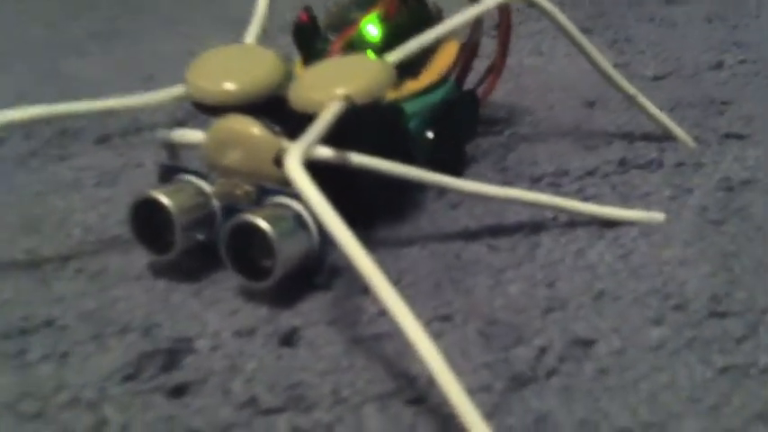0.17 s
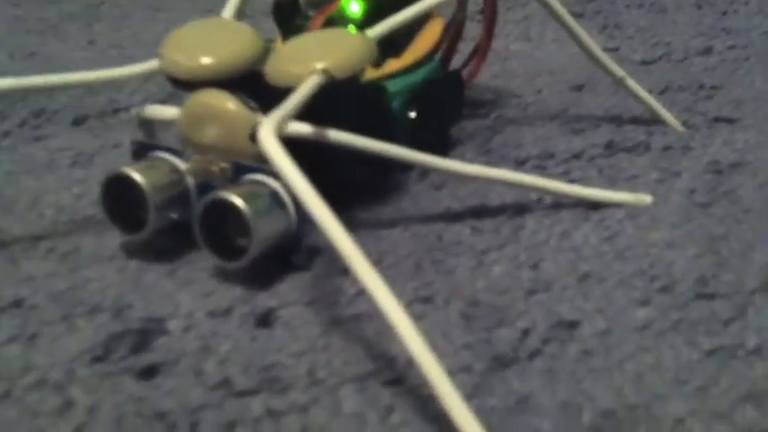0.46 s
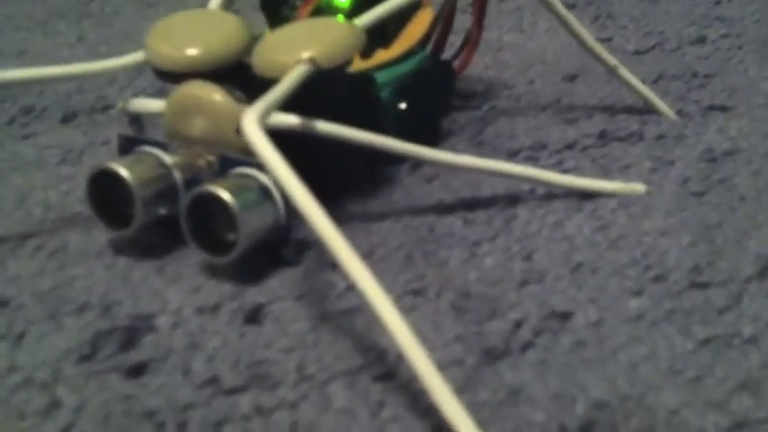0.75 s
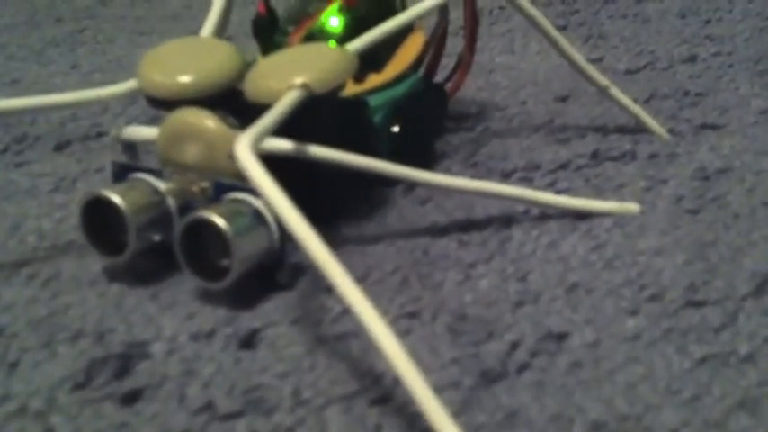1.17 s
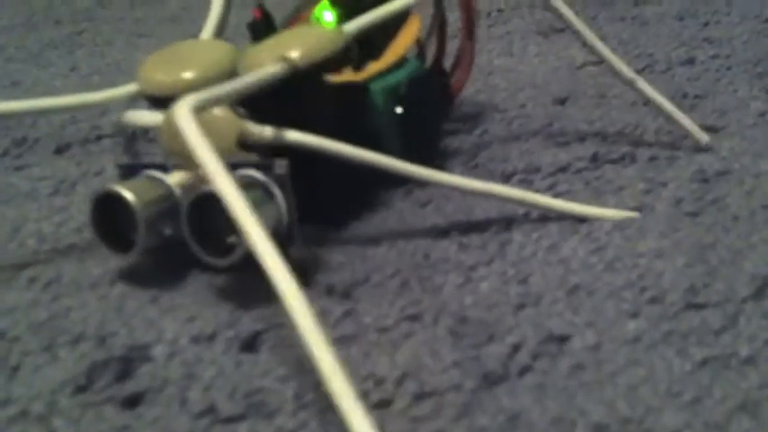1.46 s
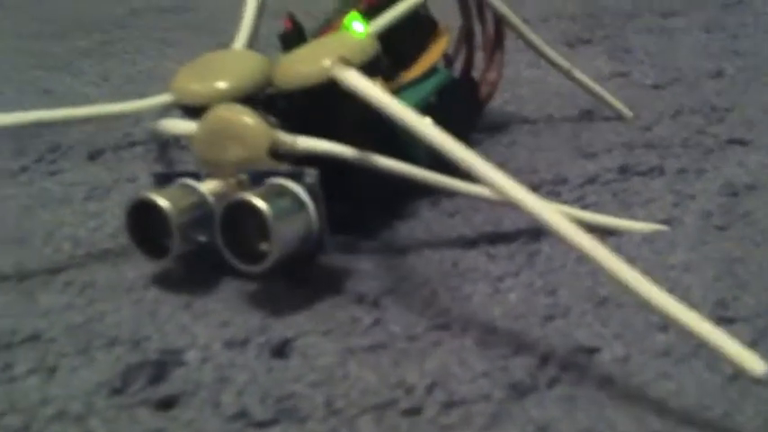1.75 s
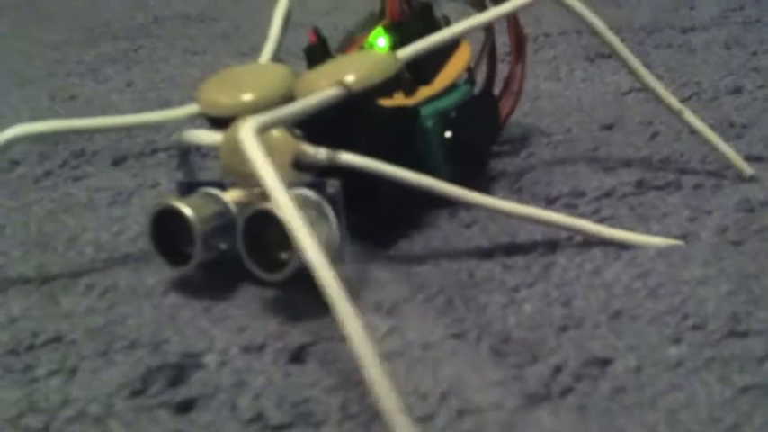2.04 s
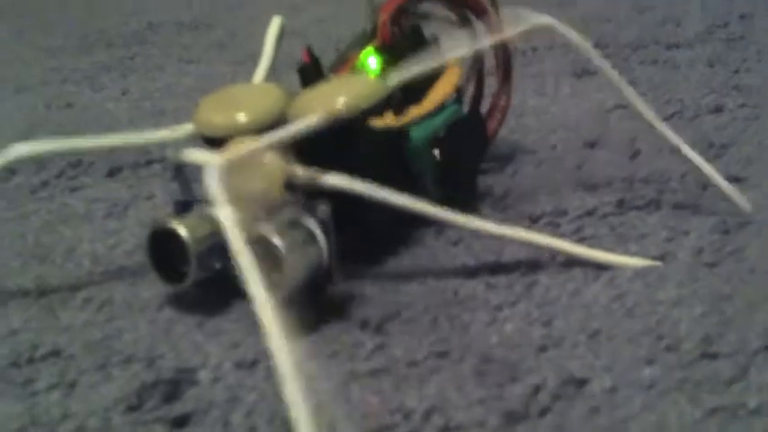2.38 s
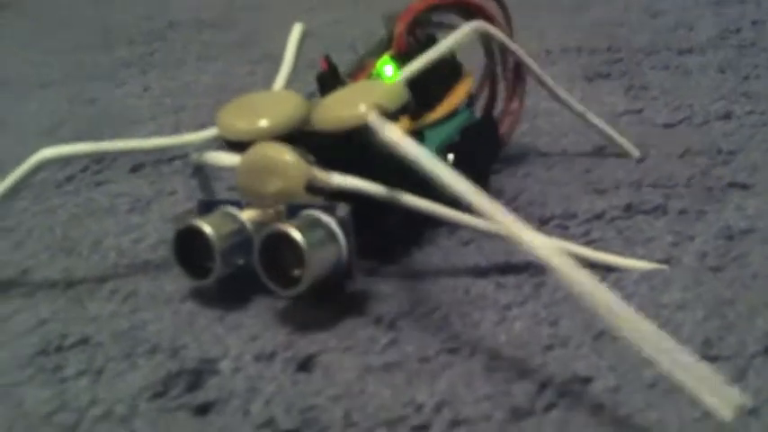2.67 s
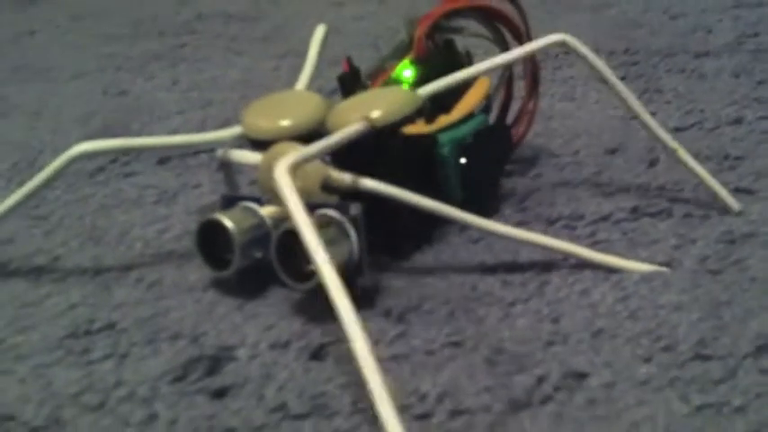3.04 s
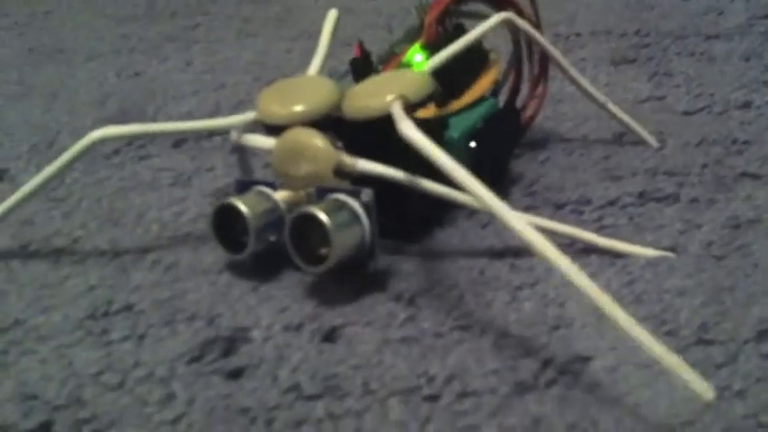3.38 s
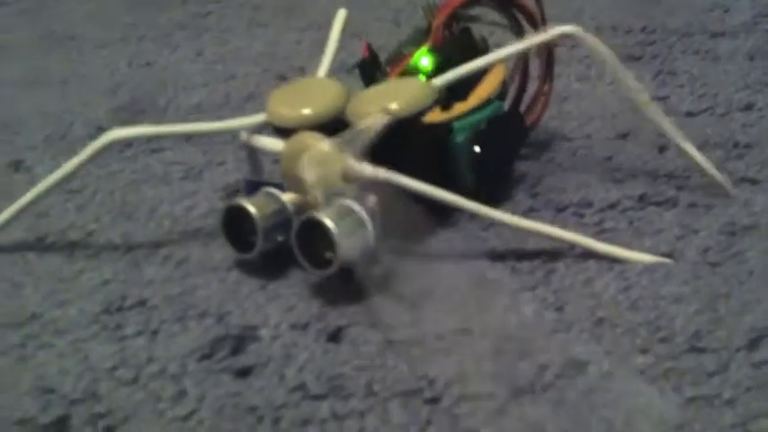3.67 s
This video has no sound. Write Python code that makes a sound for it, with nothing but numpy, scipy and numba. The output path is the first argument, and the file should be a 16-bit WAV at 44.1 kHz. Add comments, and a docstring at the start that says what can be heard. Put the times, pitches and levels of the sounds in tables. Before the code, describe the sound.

Small walking robot's servo motors whir in short, raspy, rattling bursts on carpet after a quiet start.

```python
"""First a faint rustle and a few dull taps over low hum and hiss, in a quiet carpeted room.
Then a small wire-legged robot walks on the carpet, its servos swinging the legs out quickly and back slowly.
Gear teeth rattle as random clicks in resonant plastic cases, with single knocks and a twitch per control pulse.
The feet drag on the pile as filtered grains with a low shake; taps are decaying sines with a few modes.
A short noise tail is the room; shaped noise makes the rustle, the hum and the hiss."""
import sys
import numpy as np
from scipy import signal
from scipy.fft import rfft, irfft
from scipy.io import wavfile
from numba import njit

SR = 44100
rng = np.random.default_rng(int(sys.argv[2]) if len(sys.argv) > 2 else 0)


def level_to_linear(level):
    """Convert decibel levels to linear amplitude factors, elementwise."""
    exponent = np.asarray(level, float) / 20
    return 10 ** exponent


def file_out(sig):
    """Save sig as 16-bit WAV at sys.argv[1]."""
    # one column per channel
    cols = np.atleast_2d(sig).T
    # limit, then scale
    lim = np.clip(cols, -1, 1)
    pcm = np.round(lim * 32767).astype(np.int16)
    wavfile.write(sys.argv[1], SR, pcm)


N = 168021  # length in samples
PULSE_S, FIRST_PULSE_S = 0.019986, 1.7190  # control pulses: spacing and first time


# The walk's opening stroke. Each row: start in seconds, gear level in dB before the case, foot drag in dB,
# trim of the lower ring band in dB, trim of the treble in dB.
OPENING_STROKE = [(1.335, -46, -65, 1.5, 5.5)]
# Its course. Each row: time after the start in seconds, gear level in dB relative to the stroke's.
OPENING_SHAPE = [(0, -33), (.003, -14), (0.012, -0.5), (.032, 0.5), (.05, -5), (.064, -23), (.072, -33),
                 (.1, -34), (.2, -26)]
# Colour of its case. Each row: frequency in Hz, relative density in dB per Hz.
OPENING_COLOUR = [(900, -27), (1300, -19), (2300, -18), (4200, -13), (5600, 3), (7700, 8.5), (9500, 9.5),
                  (13400, 1), (15000, -4), (15800, -14)]


def opening_stroke():
    """One stroke whose gear rattle is coloured by its own case curve."""
    return gears(OPENING_STROKE, OPENING_SHAPE, OPENING_COLOUR)


# Legs swinging out. Each row: start in seconds, gear level in dB before the case, foot drag in dB,
# trim of the lower ring band in dB, trim of the treble in dB.
OUTWARD_STROKES = [(1.875, -41.5, -73, -0.14, 1.5), (2.394, -40.5, -64.5, 0.17, -1.8),
                   (2.935, -41, -69, 0.6, 0.4), (3.474, -41, -70.5, -0.6, 0.6)]
# Their course. Each row: time after the start in seconds, gear level in dB relative to the stroke's.
OUTWARD_SHAPE = [(0, -26.5), (.009, -7.5), (0.013, -1.5), (.035, -0.5), (.05, -6), (0.067, -3.5),
                 (0.069, -11.5), (.095, -17), (0.117, -13), (.125, -22), (.19, -37), (.25, -63)]
# Colour of the case. Each row: frequency in Hz, relative density in dB per Hz.
OUTWARD_COLOUR = [(880, -45.5), (1500, -24), (1640, -44), (2270, -28.5), (2580, -34), (3230, -17),
                  (4180, -16), (4800, -5.5), (5840, 0), (6640, -3), (9100, 0), (12200, -3), (13800, -3),
                  (15300, -2.5), (15800, -18.5)]


def outward_strokes():
    """Quick strokes: the gear rattle follows the outward swing of the legs."""
    return gears(OUTWARD_STROKES, OUTWARD_SHAPE, OUTWARD_COLOUR)


# Legs coming back. Each row: start in seconds, gear level in dB before the case, foot drag in dB,
# trim of the lower ring band in dB, trim of the treble in dB.
RETURN_STROKES = [(1.597, -42.5, -64, -1.8, 0.5), (2.137, -41.5, -59, -4, -4.5),
                  (2.674, -41.5, -55.5, -0.93, -6), (3.194, -44, -58.5, 6, 2), (3.736, -43, -58, 4.3, 0.1)]
# Their course. Each row: time after the start in seconds, gear level in dB relative to the stroke's.
RETURN_SHAPE = [(0, -17), (0.011, -10), (0.033, -3), (0.065, -3), (0.08, -16.5), (0.102, -12.5),
                (.104, -26.5), (.2, -32.5), (.26, -30.5)]
# Colour of the case. Each row: frequency in Hz, relative density in dB per Hz.
RETURN_COLOUR = [(1100, -58), (1800, -22.5), (2300, -15.5), (2600, -22.5), (3150, -18), (4200, -16),
                 (4800, -6.5), (5600, -1), (6500, -3), (7700, -5), (9700, -0.5), (11000, -3.5), (13500, -5),
                 (15800, -9)]


def return_strokes():
    """Slower strokes: the gear rattle follows the return of the legs."""
    return gears(RETURN_STROKES, RETURN_SHAPE, RETURN_COLOUR)


def gears(strokes, shape, points):
    """Teeth rattle under the stroke's envelope and throb at the pulse rate while the motor coasts."""
    teeth_per_s, tooth_spread_db = 8000, 3.0
    throb_db, throb_lead_s = 3, 0.0011  # greatest swell, and its lead on the control pulse
    rattle_db, rattle_hz = -0.1, 202  # spread and rate of the chance unevenness
    t = np.arange(N) / SR
    starts, gear_db, _, lower_db, treble_db = np.transpose(strokes)
    now = np.maximum(np.searchsorted(starts, t) - 1, 0)  # the latest stroke at each sample
    envelope = sum(level(shape, s) for s in starts)
    swing_db = np.clip(20 * np.log10(envelope), -30, 0)
    coasting = np.minimum(-swing_db / 10, 1)  # 0 at full effort, 1 from 10 dB below it
    throb = coasting * np.cos(2 * np.pi * (t - FIRST_PULSE_S + throb_lead_s) / PULSE_S)
    effort_db = gear_db[now] + throb_db * throb + rattle_db * drift(rattle_hz)
    teeth = envelope * level_to_linear(effort_db) * grains(teeth_per_s, tooth_spread_db)
    return case(teeth, points, swing_db, lower_db[now], treble_db[now])


# Resonances of the plastic servo case. Each row: centre in Hz, width in Hz, level in dB before wavering.
CASE_MODES = [(5100, 1700, -18.5), (5900, 310, -13.5), (6380, 120, -25.5), (8300, 120, -24),
              (8980, 190, -15), (9740, 310, -12), (2326, 380, -26.5), (3430, 930, -24)]
# Each entry: extra share of the stroke's dB swing, for body, lower ring, upper ring and treble bands.
SWING_SHARES = (-0.56, -0.054, 0.12, 0.34)


def case(x, points, swing_db=0, lower_db=0, treble_db=0):
    """The servo case: a broad colour and narrower rings, each wavering by itself; harder effort is brighter."""
    waver_hz, ring_waver_db, band_waver_db = 50, 3.0, 1.5  # rate, and spreads of the fast wavering
    shift_hz, ring_shift_db = 9, 1.5  # rate and spread of the slower ring wavering
    sound = colour(x, points)
    for hz, width, db in CASE_MODES:
        waver_db = ring_waver_db * drift(waver_hz) + ring_shift_db * drift(shift_hz)
        sound = sound + level_to_linear(db) * resonance(x * level_to_linear(waver_db), hz, width)
    cuts = []
    for hz in (4400, 7500, 11500):  # edges between the four bands
        lowpass = signal.butter(3, hz, fs=SR, output="sos")
        cuts.append(signal.sosfiltfilt(lowpass, sound))
    bands = np.diff([0 * sound] + cuts + [sound], axis=0)
    out = 0
    for band, share, trim_db in zip(bands, SWING_SHARES, (0, lower_db, 0, treble_db)):
        out = out + band * level_to_linear(band_waver_db * drift(waver_hz) + share * swing_db + trim_db)
    return out


# The loudest single gear knocks. Each row: time in seconds, level in dB before a common trim and the case.
GEAR_KNOCKS = [(1.3489, -35.5), (1.3649, -35), (1.4, -47), (1.4171, -44), (1.4589, -43.5), (1.48, -50),
               (1.5038, -52.5), (1.5439, -54), (1.564, -51), (1.584, -50), (1.6564, -32.5), (1.694, -37),
               (1.798, -49), (1.8375, -45), (1.89, -37), (1.9368, -32.5), (1.9946, -38.5), (2.1955, -44),
               (2.2986, -56), (2.357, -44), (2.4068, -33), (2.4573, -30), (2.4756, -47), (2.4961, -36),
               (2.5152, -37.5), (2.536, -41.5), (2.555, -41), (2.576, -43), (2.5947, -43.5), (2.7048, -35),
               (2.74, -32.5), (2.7766, -39), (2.8176, -53), (2.8384, -53), (2.898, -44), (2.9354, -46),
               (2.949, -40), (2.9936, -27.5), (3.0133, -48), (3.0236, -38), (3.054, -35.5), (3.0773, -43),
               (3.0947, -39), (3.1803, -59), (3.243, -36), (3.2605, -33), (3.2947, -45), (3.3976, -41.5),
               (3.458, -46), (3.486, -35.5), (3.5367, -27), (3.5641, -36.5), (3.595, -36.5),
               (3.6337, -39.5), (3.697, -50)]
# Colour of knocks and twitches. Each row: frequency in Hz, relative density in dB per Hz.
KNOCK_COLOUR = [(1200, -21), (2300, -14.5), (3300, -9), (4200, -17.5), (5700, -6.5), (7000, -3), (9500, -5),
                (12000, -8), (15800, -10.5)]


def knocks():
    """Single gear knocks, and a servo twitch near every control pulse, ringing the case."""
    knock_trim_db, knock_decay_s = -6, 0.001
    twitch_db, twitch_spread_db, twitch_decay_s = -57.5, 2.5, 0.0031
    twitch_jitter_s, after_quick_db = 0.002, -1.5
    s, db = np.transpose(GEAR_KNOCKS)
    pulses = np.arange(FIRST_PULSE_S, N / SR, PULSE_S)
    pulses = pulses + twitch_jitter_s * rng.standard_normal(len(pulses))
    # quieter twitches from the start of a quick stroke to the start of the next slow one
    after_quick = sum((pulses > quick[0]) & (pulses < slow[0])
                      for quick, slow in zip(OUTWARD_STROKES, RETURN_STROKES[1:]))
    uneven_db = twitch_spread_db * rng.standard_normal(len(pulses))
    pulse_db = twitch_db + uneven_db + after_quick_db * after_quick
    single = rebounding(s, db + knock_trim_db, knock_decay_s)
    twitches = rebounding(pulses, pulse_db, twitch_decay_s)
    return case(single + twitches, KNOCK_COLOUR)


def rebounding(s, db, decay_s):
    """Each rattle is followed by a weaker one, 3 to 8 milliseconds later."""
    rebound_db, spread_db = -8, 3  # relative to the first rattle, give or take the spread
    chance = rng.random((len(s), 2))
    later = s + 0.003 + (0.008 - 0.003) * chance[:, 0]
    later_db = db + rebound_db + spread_db * (2 * chance[:, 1] - 1)
    return bursts(s, db, decay_s) + bursts(later, later_db, decay_s)


def bursts(s, db, decay_s):
    """Short noisy rattles at the given times: quick rise, dying away."""
    rise_s = 0.0003
    clicks = np.zeros(N)
    np.add.at(clicks, np.minimum((np.asarray(s) * SR).astype(int), N - 1), level_to_linear(db))
    rise = np.exp(-1 / (rise_s * SR))
    decay = np.exp(-1 / (decay_s * SR))
    shape = signal.lfilter([1 - rise], np.convolve([1, -rise], [1, -decay]), clicks + 1e-18)
    return shape * rng.choice([-1, 1], N)


# Feet on the carpet pile. Each row: frequency in Hz, relative density in dB per Hz.
PILE_COLOUR = [(300, -10.5), (500, 0.5), (850, 1), (1500, -5), (2500, -14), (4000, -15.5)]


def feet():
    """Feet drag over the pile in mid-stroke, as grains of fibre, and shake the floor a little."""
    fibres_per_s, fibre_spread_db = 2500, 3.0
    peak_s = 0.047  # after the stroke's start
    drag_width_s, shake_width_s = 0.022, 0.086  # time from the peak to 4.1 and 2.5 dB below it
    shake_db, shake_hz = -85, 69.5  # peak level, low-pass corner
    t = np.arange(N) / SR
    drag = shake = 0
    for s, _, drag_db, *_ in OPENING_STROKE + OUTWARD_STROKES + RETURN_STROKES:
        drag = drag + level_to_linear(drag_db - 4.1 * ((t - s - peak_s) / drag_width_s) ** 2)
        shake = shake + level_to_linear(shake_db - 2.5 * ((t - s - peak_s) / shake_width_s) ** 2)
    lowpass = signal.butter(2, shake_hz, fs=SR, output="sos")
    low = signal.sosfilt(lowpass, rng.standard_normal(N))
    pile = colour(drag * grains(fibres_per_s, fibre_spread_db), PILE_COLOUR)
    return pile + shake * rms_one(low)


# Dull taps before and during the walk. Each row: time in seconds, nominal peak in dB, pitch in Hz.
DULL_TAPS = [(0.565, -52.5, 677), (0.609, -53, 1100), (0.936, -50.5, 1110), (1.38, -40.5, 984),
             (1.644, -43, 3090), (2.155, -47, 797), (2.19, -42.5, 825), (2.197, -48.5, 1510),
             (2.695, -51, 790), (2.734, -51, 894), (3.257, -45, 1580)]


def taps():
    """Short dull rings: three neighbouring modes and weaker higher ones."""
    t60_s, rise_s, spread = 0.022, 0.0007, 0.09  # spread: spacing of neighbours as a share of the pitch
    upper_ratios, upper_db = (1.9, 2.75, 3.9), -14.5  # multiples of the pitch
    out = 0
    for s, db, hz in DULL_TAPS:
        t = np.maximum(np.arange(N) / SR - s, 0)
        near = sum(0.5 * np.sin(2 * np.pi * hz * (1 + k * spread) * t) for k in (-1, 0, 1))
        upper = sum(np.sin(2 * np.pi * hz * k * t) for k in upper_ratios)
        envelope = level_to_linear(db - 60 * t / t60_s) * (1 - np.exp(-t / rise_s))
        out = out + envelope * (near + level_to_linear(upper_db) * upper)
    return out


def room(x):
    """A carpeted room: a short dying noise tail after the direct sound."""
    t60_s, room_db = 0.15, -12.5
    t = np.arange(SR // 2) / SR
    tail = rng.standard_normal(len(t)) * level_to_linear(-60 * t / t60_s) * (t > 0.004)
    return level_to_linear(room_db) * signal.fftconvolve(x, tail / np.sqrt(np.sum(tail ** 2)))[:N]


# Faint rustle nearby. Each row: time in seconds, level in dB.
RUSTLE_LEVEL = [(0.0, -81), (0.1, -67.5), (0.556, -75), (0.564, -68), (0.702, -79), (0.918, -87),
                (1.3, -106)]
# Its colour. Each row: frequency in Hz, relative density in dB per Hz.
RUSTLE_SPECTRUM = [(600, -24), (1100, -7), (2500, -9.5), (4200, -8.5), (6000, -15.5)]


def rustle():
    """A faint rustle: coloured noise under a slow level curve."""
    return level(RUSTLE_LEVEL) * colour(rng.standard_normal(N), RUSTLE_SPECTRUM)


# Hum and hiss of the quiet room. Each row: frequency in Hz, relative density in dB per Hz.
HUM_AND_HISS = [(12, -77), (20, -29), (48, -53), (70, -24.5), (172, 2.5), (397, -12.5), (431, -6.5),
                (469, -18), (524, -13), (570, -21), (775, -22), (1510, -30.5), (1840, -30), (2880, -31.5),
                (3800, -31.5), (15800, -36.5)]


def room_tone():
    """Low hum and hiss: coloured noise whose level wavers slightly."""
    tone_db, waver_db, waver_hz = -55.5, 0.5, 4.0
    return level_to_linear(tone_db + waver_db * drift(waver_hz)) * colour(rng.standard_normal(N), HUM_AND_HISS)


def grains(rate, spread_db):
    """Random clicks of uneven size, rms 1; rate is their mean number per second."""
    sizes = level_to_linear(spread_db * np.minimum(rng.exponential(1, N), 4.2)) * rng.choice([-1, 1], N)
    return rms_one(sizes * (rng.random(N) < rate / SR))


def resonance(x, hz, width):
    """Resonance that keeps the power of white noise; its centre wanders at random."""
    r = np.exp(-np.pi * width / SR)
    centre = hz * (1 + 0.012 * drift(9))  # spread 1.2 percent, rate 9 Hz
    return np.sqrt((1 - r * r) / 2) * ringing(x + 1e-18, r, 2 * r * np.cos(2 * np.pi * centre / SR))


@njit
def ringing(x, r, bend):
    """Two-pole recursion whose centre changes sample by sample."""
    out = np.zeros(len(x))
    for i in range(2, len(x)):
        out[i] = x[i] - x[i - 2] + bend[i] * out[i - 1] - r * r * out[i - 2]
    return out


def colour(x, points, size=16384):
    """Causal minimum-phase filter with the given spectrum and unit energy."""
    hz, db = np.transpose(points)
    grid = np.maximum(np.arange(size // 2 + 1) * SR / size, 1)
    cepstrum = irfft(np.interp(np.log(grid), np.log(hz), db) * np.log(10) / 20)
    cepstrum[1:size // 2] *= 2  # fold to the causal side
    cepstrum[size // 2 + 1:] = 0
    pulse = irfft(np.exp(rfft(cepstrum)))
    return signal.fftconvolve(x, pulse / np.sqrt(np.sum(pulse ** 2)))[:N]


def drift(rate_hz):
    """Slow chance, spread 1: twice-smoothed noise made at a sixteenth of the sample rate."""
    r = np.exp(-32 * np.pi * rate_hz / SR)
    noise = rng.standard_normal(N // 16 + 3002)
    slow = signal.lfilter([1], [1, -2 * r, r * r], noise)[3000:]  # settled part
    return np.interp(np.arange(N) / 16, np.arange(len(slow)), rms_one(slow))


def level(rows, start=0):
    """Gain along a curve of seconds and dB, practically silent outside it."""
    s, db = np.transpose(rows)
    return level_to_linear(np.interp(np.arange(N) / SR - start, s, db, left=-200, right=-200))


def rms_one(x):
    """Scale to rms 1."""
    return x / np.sqrt(np.mean(x ** 2) + 1e-20)


def scene():
    """Robot and taps with their room tail, then rustle, hum and hiss, on one channel."""
    strokes = opening_stroke() + outward_strokes() + return_strokes()
    robot = strokes + knocks() + feet() + taps()
    return (robot + room(robot) + rustle() + room_tone())[None]


def band_limit(x):
    """A steep low-pass at the top of the band."""
    return signal.sosfilt(signal.butter(12, 16020, fs=SR, output="sos"), x)


def record(dry):
    """The top is cut steeply above 15850 Hz."""
    steep_cut = signal.ellip(12, 0.3, 70, 15850, fs=SR, output="sos")  # 0.3 dB ripple, 70 dB rejection
    mix = signal.sosfilt(steep_cut, dry)
    return band_limit(mix)


dry = scene()
out = record(dry)
file_out(out)
```